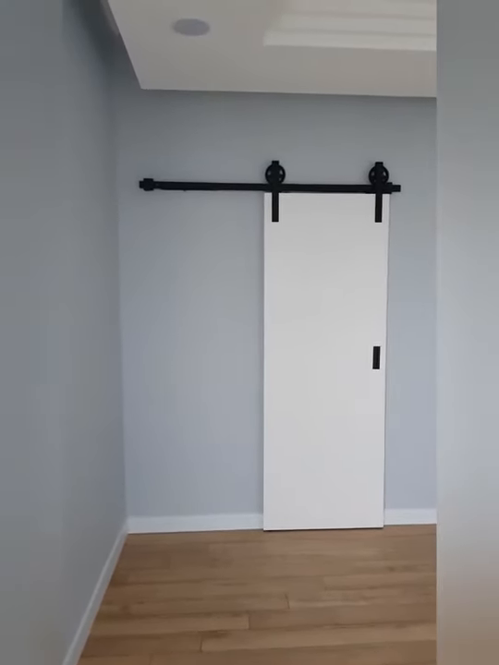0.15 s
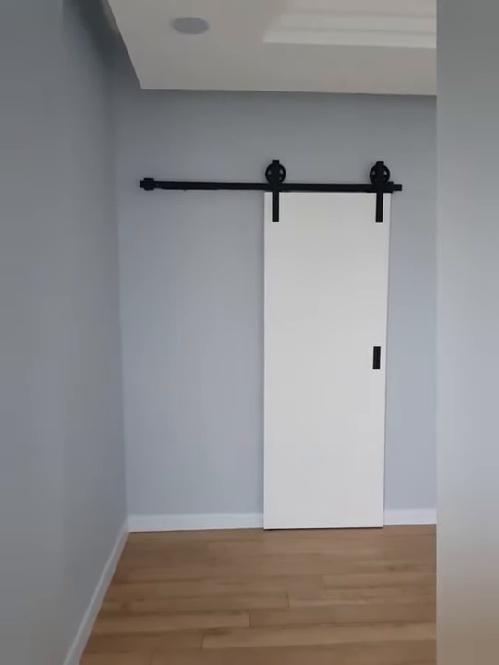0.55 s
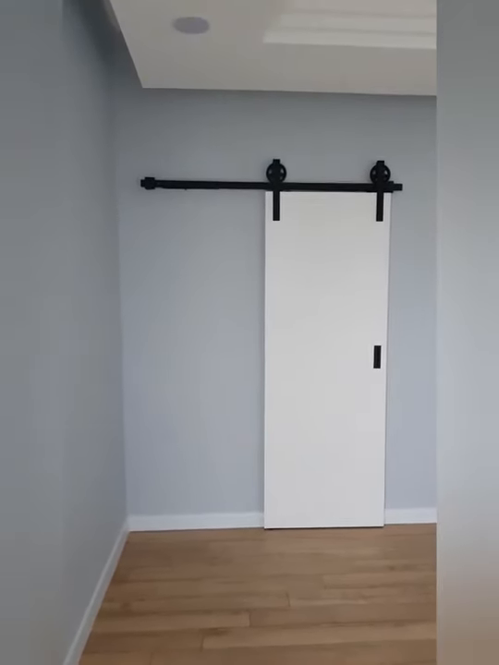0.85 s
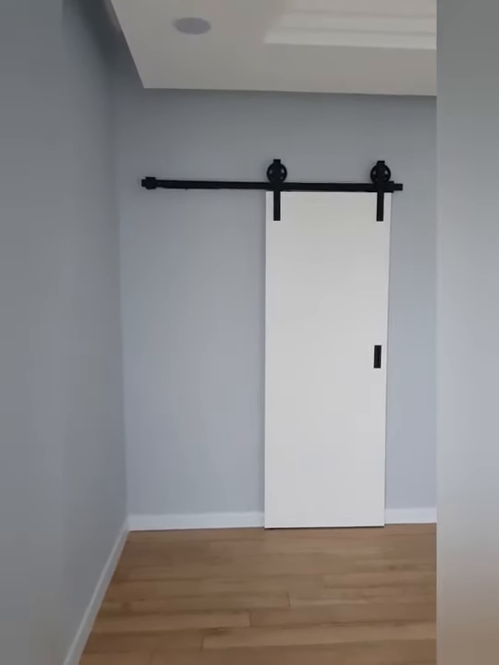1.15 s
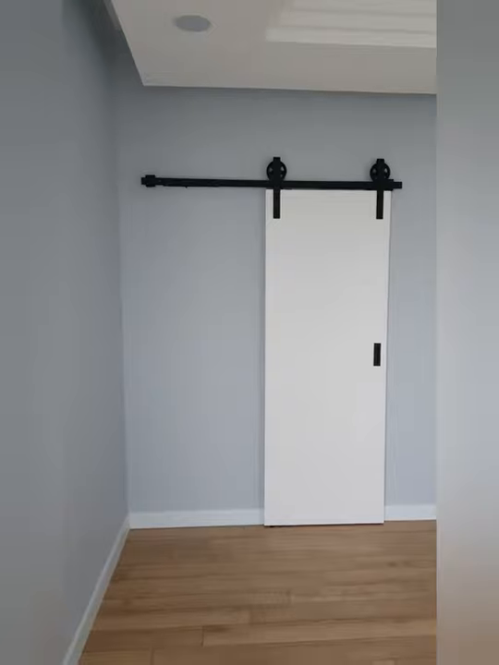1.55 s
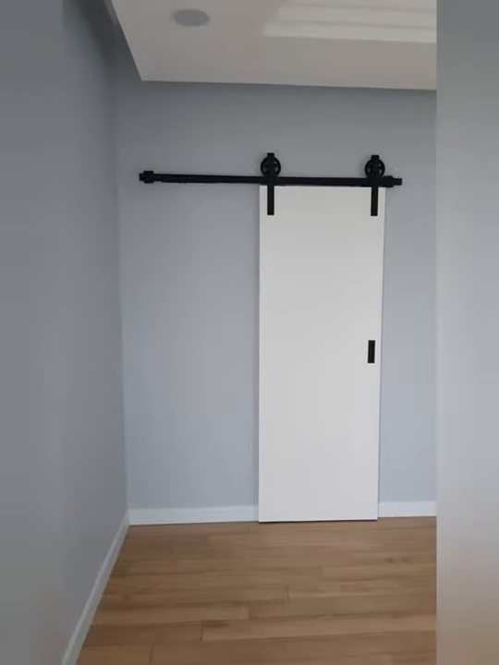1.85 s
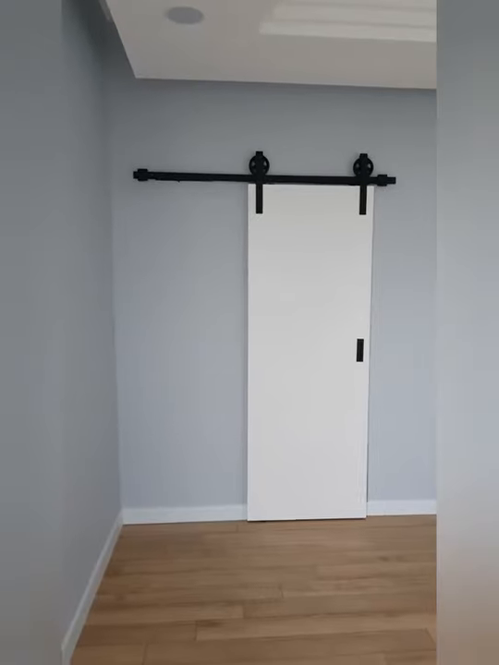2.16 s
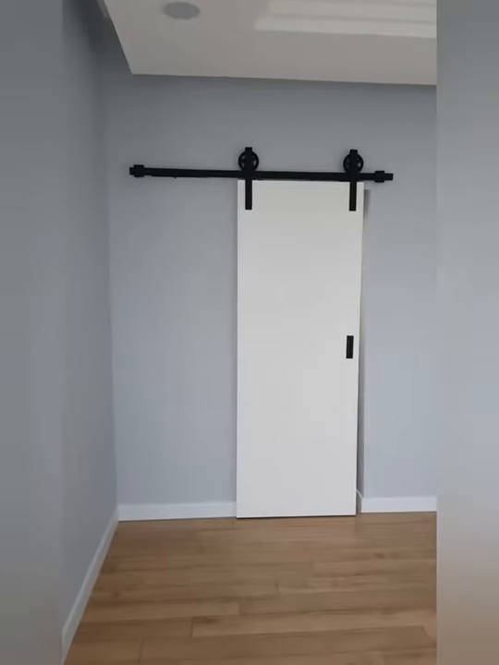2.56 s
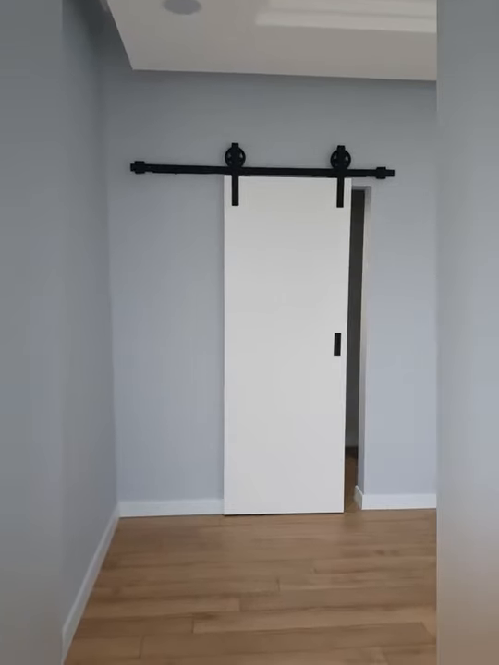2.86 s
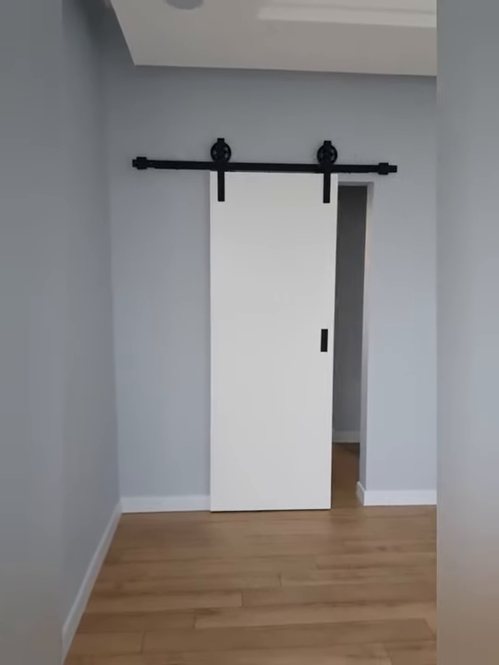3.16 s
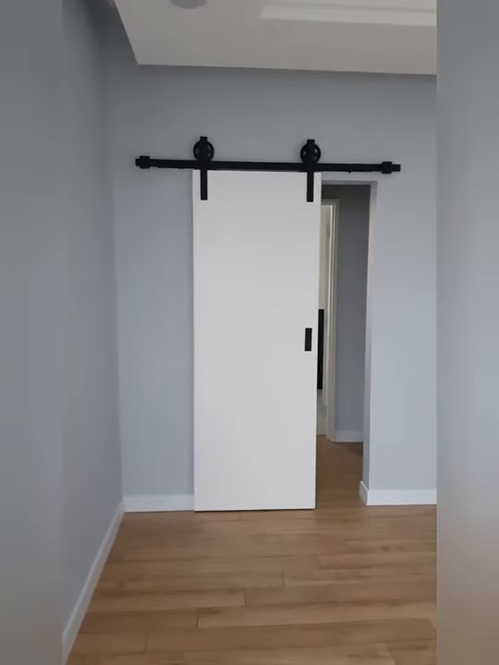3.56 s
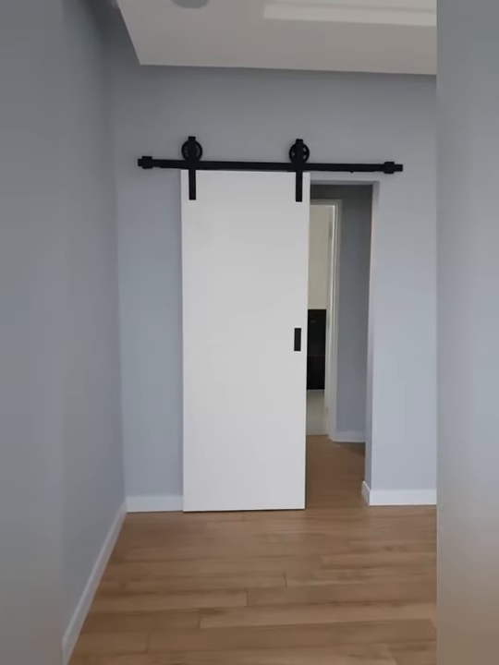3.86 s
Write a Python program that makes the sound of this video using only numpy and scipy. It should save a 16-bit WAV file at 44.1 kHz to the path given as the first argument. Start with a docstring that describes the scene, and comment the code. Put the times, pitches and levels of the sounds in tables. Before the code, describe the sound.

A hanging wooden sliding door rolls open: faint scuffs first, then a heavy shuddering thump, quieter low rumble with bumps, and a ringing scrape near the end, in an empty echoing room with low ventilation murmur.

```python
"""Ventilation murmurs in a bare, echoing room and a soft brush passes; then a hanging wooden door rolls open.
A few echoing scuffs lead to a heavy shudder: bumps and jolts of its wheels on the steel rail ring the panel.
It rumbles on with more scuffs, and near the end the panel scrapes along its guide, ringing the rail.
Scuffs and scrape are coloured friction grains; a thin squeak and soft brushes are narrowed grains,
a metal tick is a dying burst of band noise, and the ventilation is coloured, slightly wavering noise."""
import sys
import numpy as np
from scipy import signal
from scipy.fft import rfft, irfft
from scipy.io import wavfile
from scipy.ndimage import uniform_filter1d

SR = 44100
rng = np.random.default_rng(int(sys.argv[2]) if len(sys.argv) > 2 else 0)


def dump_mix(stems):
    """Bounce the given channels to the path in sys.argv[1] as a 16-bit WAV at rate SR."""
    frames = np.atleast_2d(stems).T  # one column per channel
    limited = np.clip(frames, -1, 1)  # hard clip at full scale
    pcm = np.round(limited * 32767).astype(np.int16)
    wavfile.write(sys.argv[1], SR, pcm)


N = 176400  # samples, 4 s

# Force of the wheels on the rail: time_s, level_db, rattle_lift_db (rattle against the low notes)
ROLL_FORCE = [(1.69, -82, 2), (1.72, -33.5, 9), (1.79, -25, 2), (1.85, -23, 0.5), (1.90, -27.5, -6),
              (2.02, -27.5, 1), (2.14, -26, -10), (2.28, -32, -3.5), (2.44, -34.5, -6), (2.52, -37.5, -23),
              (2.63, -44.5, 4.5), (2.78, -36.5, 1), (2.97, -37.5, 1.5), (3.22, -38, 5), (3.48, -35, 3.5),
              (3.66, -40, 2.5), (3.86, -36, 2), (4.0, -41, 5.5)]
# Resonances of the door panel on its rail: pitch_hz, width_hz, level_db
PANEL_MODES = [(54.5, 9.3, 2.5), (73.8, 17, -3.5), (84.8, 8.7, -0.5), (131.9, 3.34, 5), (140.6, 6.2, 3),
               (156, 4.3, -8), (183.8, 8.4, -5), (218.4, 6.4, 3), (243, 6.4, -9.5), (262.2, 10, -7),
               (291.3, 10.5, -13), (310.6, 6.6, -17), (365, 80, -12)]
# Push of the wheels on the panel: pitch_hz, level_db
WHEEL_PUSH = [(20, -62), (45, 9.5), (150, 6), (330, 2.5), (480, -11), (900, -17), (2000, -59), (8000, -55)]
BUMPS_PER_S, BUMP_SCATTER_DB, ROLL_SIDE_DB = 600, 2.5, -19.5
RATTLE_HZ = 183  # the rattle lies above this
# Jolts of the door on its hangers: start_s, peak_db
HANGER_JOLTS = [(0.956, -34.5), (1.721, -34), (1.767, -18), (1.827, -30), (2.95, -26.5), (3.158, -24)]
JOLT_DECAY_S = 0.0083

# Pressure of the panel on its guide: time_s, level_db
SCRAPE_PRESSURE = [(3.30, -110), (3.37, -38), (3.41, -36.5), (3.46, -33.5), (3.51, -42), (3.58, -51),
                   (3.66, -40), (3.725, -37), (3.80, -43.5), (3.94, -40.5), (4.0, -49)]
# Colour of the scrape: pitch_hz, level_db
GUIDE_COLOUR = [(150, 4), (400, 3), (800, 6.5), (1300, 4), (2200, -1), (3000, -8.5), (4400, -9.5),
                (6500, -18), (8300, -29), (11500, -27.5), (15500, -40.5)]
# Ringing of the rail: pitch_hz, width_hz, level_db
RAIL_MODES = [(719, 3.2, 5), (774, 15, -6), (857, 2.3, 10.5), (1080, 14, -3), (1260, 12, -3),
              (1820, 9.7, -1), (1955, 20, 3), (3970, 67, 1)]
GRAINS_PER_S, GRAIN_SCATTER_DB = 3500, 4

# Echoing scuffs as the door is handled: start_s, rise_s, hold_s, fade_s, level_db,
# brightness_db_per_octave, low_body_db, airy_top_db
SCUFF_EVENTS = [(0.98, 0.015, 0.04, 0.11, -49.5, 2.5, -28, 1),
                (1.218, 0.11, 0.054, 0.12, -41.5, -3.85, -12.5, 12.5),
                (1.52, 0.042, 0.17, 0.55, -44.5, -1.5, 6, 6), (2.502, 0.16, 0.011, 0.048, -48.5, 1, -1, -1),
                (2.63, 0.031, 0.022, 0.099, -40, -1, -1.5, 6),
                (2.803, 0.079, 0.034, 0.27, -48, -0.5, 2, 5.5)]
# Shared colour of the scuffs: pitch_hz, level_db
SCUFF_COLOUR = [(150, -23), (450, -4.5), (1000, -1), (1500, -2.5), (2300, -2.5), (3200, -9.5), (4500, -13),
                (6700, -18.5), (8300, -31.5), (11000, -29), (15500, -42)]
SCUFF_GRAINS_PER_S, SCUFF_SCATTER_DB = 4000, 4
SHORTEST_RISE_S = 0.04  # floor for the length of the attack
SCUFF_PIVOT_HZ, BODY_HZ, AIRY_HZ = 1800, 790, 8100

# Faint high sounds, soft brushes and a squeak:
# start_s, length_s, pitch_hz, width_hz (of one resonance pass), level_db
FAINT_RUBS = [(0.264, 0.32, 4200, 3120, -69), (2.923, 0.095, 11000, 900, -62),
              (3.73, 0.2, 11900, 6040, -64.5)]
# TICK_WIDTH_HZ is the width of one resonance pass
TICK_S, TICK_DECAY_S, TICK_HZ, TICK_WIDTH_HZ, TICK_DB = 3.242, 0.0055, 5250, 2000, -56

# Reverberation of the room: pitch_hz, t60_s
REVERB_TIMES = [(100, 0.68), (500, 0.86), (2000, 0.87), (6000, 1), (15000, 0.22)]
DIRECT_DB, ROOM_DRIFT_HZ = -11.5, 1.093

# Colour of the ventilation and hiss: pitch_hz, level_db (per Hz)
AIR_COLOUR = [(20, -9), (31, 0), (42, -16), (53, 5.5), (72, -9), (100, -8.5), (135, -9.5), (200, -15.5),
              (245, -9), (320, -16.5), (450, -19.5), (600, -25), (900, -24.5), (1500, -30), (2500, -38.5),
              (3400, -53), (5700, -50.5), (8400, -66), (12000, -52.5), (15500, -54.5)]
# Width of the air noise: pitch_hz, side_minus_mid_db
AIR_WIDTH = [(30, -18), (60, -23), (125, -15.5), (250, -14), (500, -5), (1000, 1.5), (2000, 1), (15000, 0)]
AIR_DB, AIR_WAVER_DB = -41, 0.68

# Stereo balance: pitch_hz, left_minus_right_db
STEREO_BALANCE = [(60, -0.5), (130, -.5), (250, -1.5), (500, -2), (800, 0.5), (1300, -4.5), (2500, -4),
                  (5000, -2.2), (8000, -1.5), (15000, 1)]
LOW_CUT_HZ, TOP_HZ = 28.6, 15750
SIDES = np.array([[1], [-1]])  # side signal: plus on the left, minus on the right


def undb(db):
    """Turn decibels into gain."""
    return 10 ** (np.asarray(db) / 20)


def unit(x):
    """Scale to rms 1."""
    return x / np.sqrt(np.mean(x ** 2) + 1e-20)


def times():
    """Time of every sample in seconds."""
    return np.arange(N) / SR


def freqs():
    """Frequency axis of the filters in Hz, kept at 1 or above."""
    return np.maximum(np.arange(N + 1) * SR / (2 * N), 1)


def colour(points):
    """Gain per frequency, drawn through (Hz, dB) points on a log axis."""
    hz, db = np.array(points, float).T
    return undb(np.interp(np.log(freqs()), np.log(hz), db))


def curve(points):
    """Gain over time, drawn through (s, dB) points."""
    return undb(np.interp(times(), *np.array(points, float).T))


def shape(x, response):
    """Filter by a frequency response, the sound mirrored at its end."""
    mirrored = np.concatenate([x, x[..., ::-1]], axis=-1)
    return irfft(rfft(mirrored) * response)[..., :N]


def resonances(modes):
    """Summed response of damped modes, each a peak at hz with its own width and level."""
    f = freqs()
    return sum(undb(db) / (1 + 1j * (f * f - hz * hz) / (f * width)) for hz, width, db in modes)


def grains(rate, scatter_db):
    """Random tiny impacts of either sign and uneven size, at rms 1."""
    hit = rng.random(N) < rate / SR
    size = np.minimum(rng.exponential(size=N), 4)
    sign = rng.choice([-1, 1], N)
    return unit(hit * sign * undb(scatter_db * size))


def rolling():
    """Wheel bumps and a few jolts ring the panel; its rattle rises and falls against the low notes."""
    body = resonances(PANEL_MODES) * colour(WHEEL_PUSH)
    mid = shape(grains(BUMPS_PER_S, BUMP_SCATTER_DB), body)
    side = shape(grains(BUMPS_PER_S, BUMP_SCATTER_DB), body)
    # level out the chance swells, so the force curve sets the loudness
    steady = mid / np.sqrt(uniform_filter1d(mid ** 2, SR // 16) + 1e-12)
    wheels = steady + undb(ROLL_SIDE_DB) * unit(side) * SIDES
    rattle = shape(wheels, 1 - 1 / (1 + (freqs() / RATTLE_HZ) ** 8))
    roll = np.array(ROLL_FORCE)
    force = curve(roll[:, [0, 1]])
    lift = curve(roll[:, [0, 2]])
    out = force * (wheels + (lift - 1) * rattle)
    for start, peak_db in HANGER_JOLTS:
        age = np.maximum(times() - start, 0) / JOLT_DECAY_S
        push = np.exp(-age) * np.minimum(age * 10, 1)
        thud = shape(push, body)
        out = out + undb(peak_db) * thud / np.abs(thud).max()
    return out


def scrape():
    """The panel drags along its guide: friction grains set the rail ringing."""
    friction = grains(GRAINS_PER_S, GRAIN_SCATTER_DB)
    ringing = colour(GUIDE_COLOUR) * (1 + resonances(RAIL_MODES))
    return curve(SCRAPE_PRESSURE) * unit(shape(friction, ringing))


def scuffs():
    """Short rubs of dense friction grains, each with its own brightness."""
    t, f, out = times(), freqs(), 0
    for start, rise, hold, fade, db, bright_db, body_db, airy_db in SCUFF_EVENTS:
        progress = np.clip((t - start) / max(rise, SHORTEST_RISE_S), 0, 1)
        attack = np.sin(np.pi / 2 * progress) ** 2
        envelope = attack * np.exp(-np.maximum(t - start - rise - hold, 0) / fade)
        low_body = body_db / (1 + (f / BODY_HZ) ** 4)
        airy_top = airy_db / (1 + (AIRY_HZ / f) ** 8)
        tilt = bright_db * np.log2(f / SCUFF_PIVOT_HZ)
        tone = colour(SCUFF_COLOUR) * undb(tilt + low_body + airy_top)
        rub = shape(grains(SCUFF_GRAINS_PER_S, SCUFF_SCATTER_DB), tone)
        out = out + undb(db) * envelope * unit(rub)
    return out


def faint_rubs():
    """Brief friction grains, each swelling and fading through one high resonance."""
    out = 0
    for start, length, hz, width, db in FAINT_RUBS:
        envelope = np.sin(np.pi * np.clip((times() - start) / length, 0, 1))
        resonance = resonances([(hz, width, 0)]) ** 2  # two passes
        noise = unit(shape(grains(GRAINS_PER_S, GRAIN_SCATTER_DB), resonance))
        out = out + undb(db) * envelope * noise
    return out


def tick():
    """One small metal tick from a hanger: resonant noise with a sharp start and fast decay."""
    age = times() - TICK_S
    resonance = resonances([(TICK_HZ, TICK_WIDTH_HZ, 0)]) ** 2
    ring = unit(shape(rng.standard_normal(N), resonance))
    return undb(TICK_DB) * (age > 0) * np.exp(-np.abs(age) / TICK_DECAY_S) * ring


def room():
    """Response of the bare room: a diffuse noise tail per side, with a decay time for each band."""
    noise, tail = rng.standard_normal((2, N)), 0
    hz, t60 = np.array(REVERB_TIMES).T
    for share, band_t60 in zip(np.eye(len(hz)), t60):
        band = shape(noise, np.interp(np.log(freqs()), np.log(hz), share))
        decay = np.exp(-np.log(1000) * times() / band_t60)
        tail = tail + band * unit(decay) / np.sqrt(N)
    return rfft(tail, 2 * N)


def ventilation():
    """Air noise with a slight waver, alike on both sides in the bass and diffuse above."""
    mid, side = shape(rng.standard_normal((2, N)), colour(AIR_COLOUR))
    waver = unit(shape(rng.standard_normal(N), np.exp(-freqs() / 5)))  # a few Hz
    both = mid + shape(side, colour(AIR_WIDTH)) * SIDES
    return both / mid.std() * undb(AIR_DB + AIR_WAVER_DB * waver)


def scene():
    """Mix the rumble, the friction in a drifting echo, the tick and the air, then balance the sides."""
    rumble = rolling()
    click = tick()
    dry = scrape() + scuffs() + faint_rubs() + click
    # the echo turns between two room patterns
    turn = 2 * np.pi * ROOM_DRIFT_HZ * times()
    echo = np.cos(turn) * shape(dry, room()) + np.sin(turn) * shape(dry, room())
    friction = echo + undb(DIRECT_DB) * dry
    mix = rumble + friction + click + ventilation()  # the tick also sounds up close
    return shape(mix, colour(STEREO_BALANCE) ** np.array([[.5], [-.5]]))


def record(dry):
    """Cut the deepest bass and the extreme top steeply."""
    thinned = shape(dry, 1 - 1 / (1 + (freqs() / LOW_CUT_HZ) ** 8))
    top_cut = signal.ellip(10, .2, 80, TOP_HZ, fs=SR, output="sos")
    return signal.sosfilt(top_cut, thinned)


dry = scene()
out = record(dry)
dump_mix(out)
```